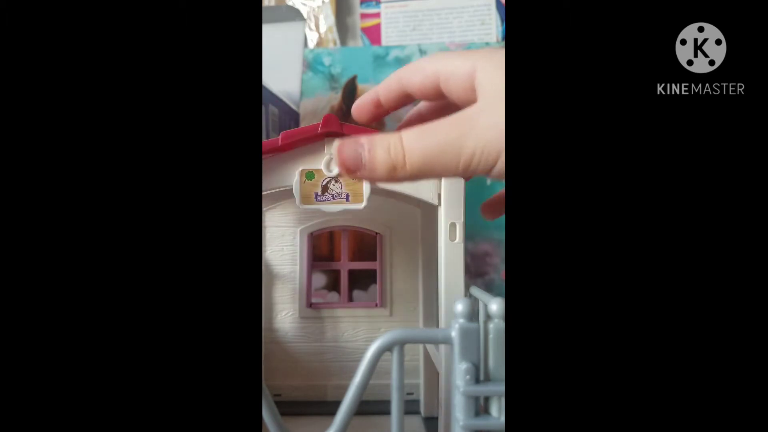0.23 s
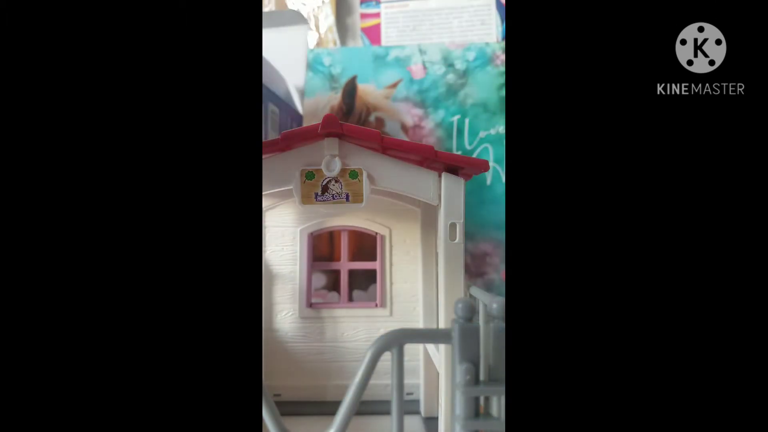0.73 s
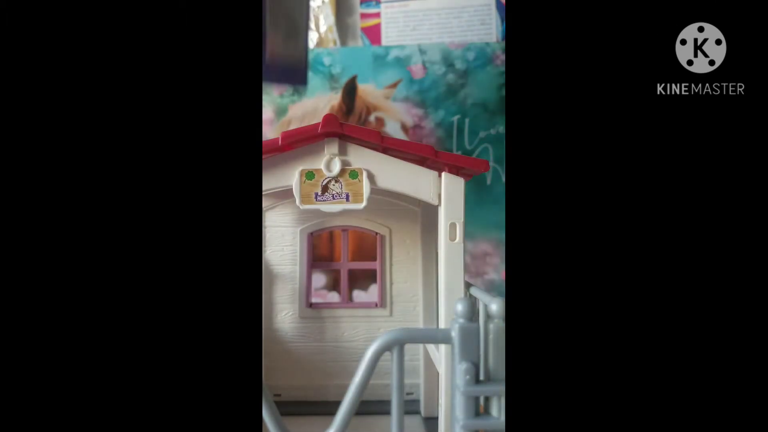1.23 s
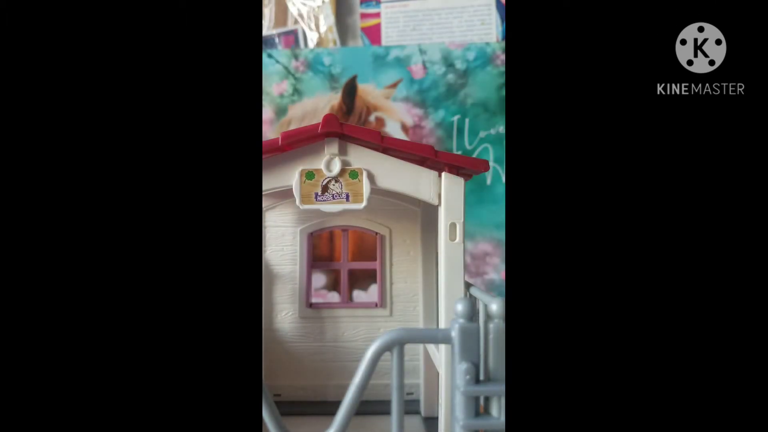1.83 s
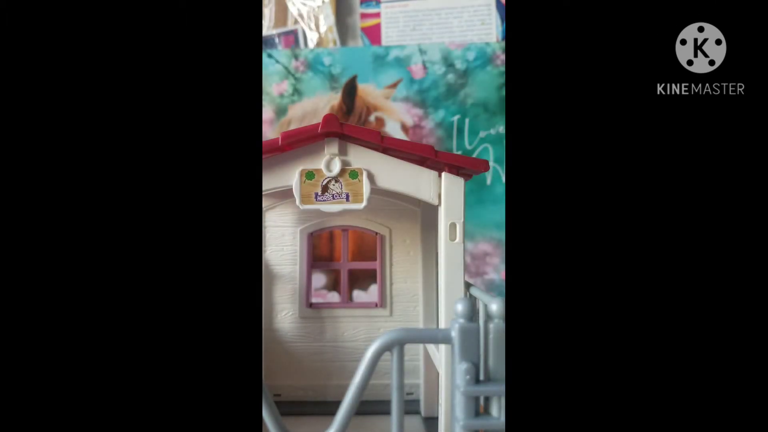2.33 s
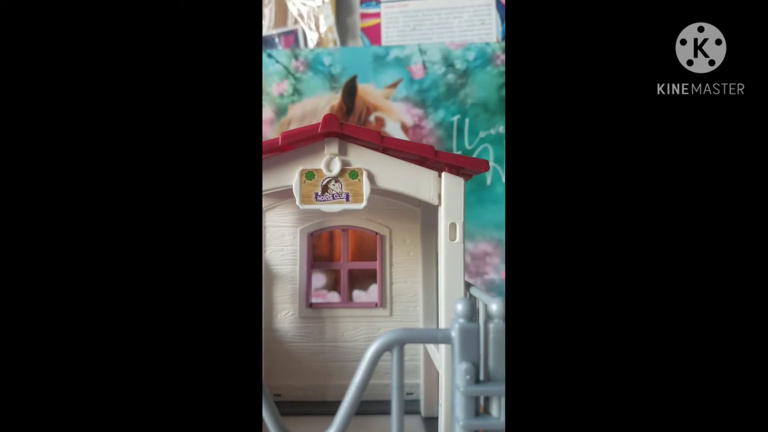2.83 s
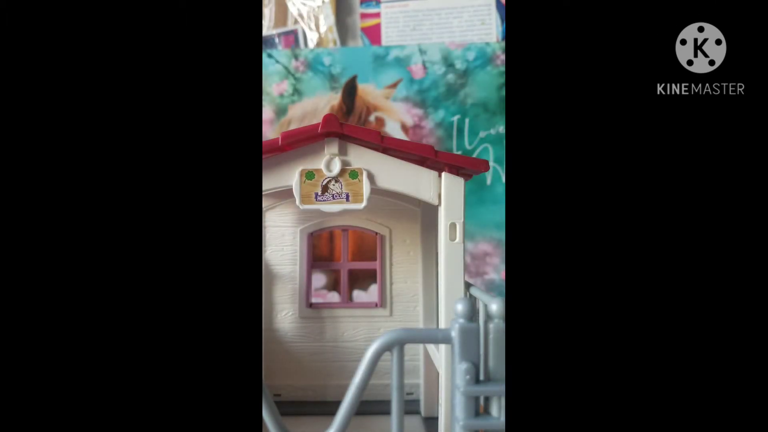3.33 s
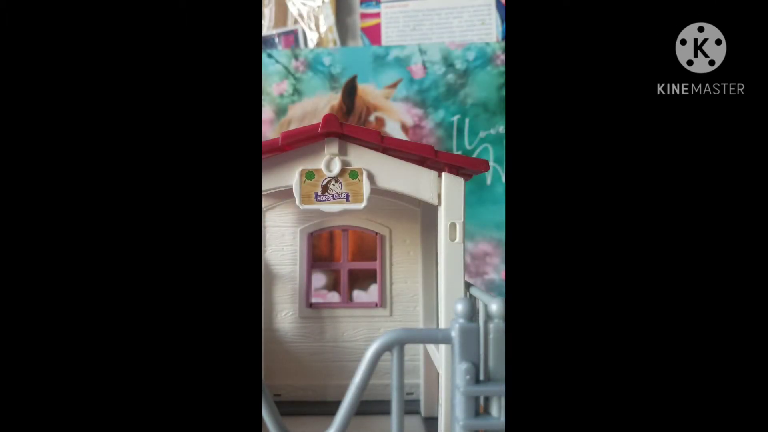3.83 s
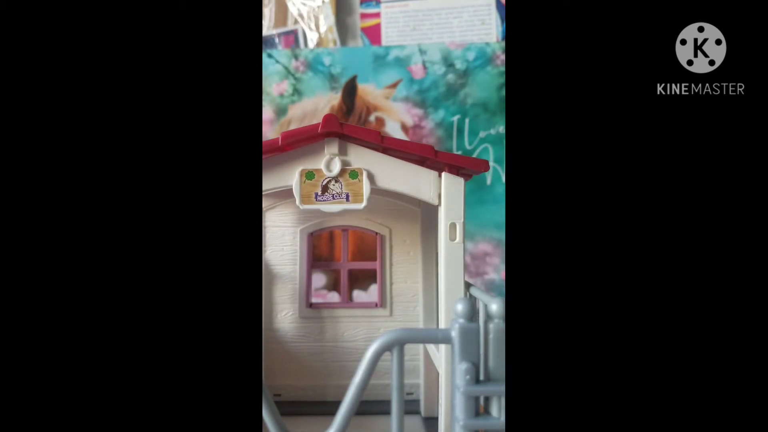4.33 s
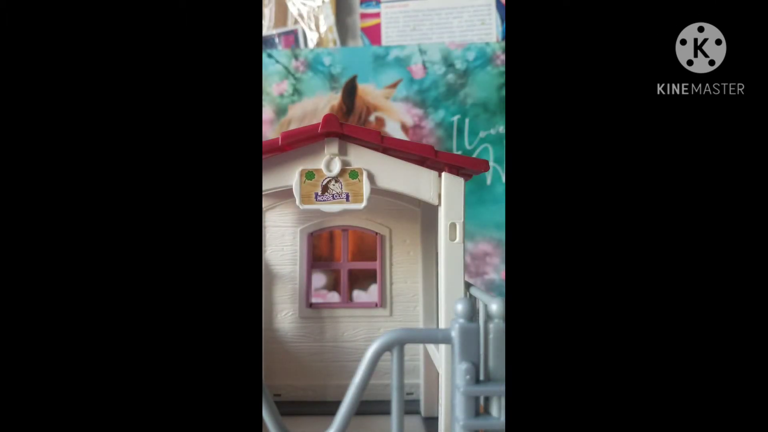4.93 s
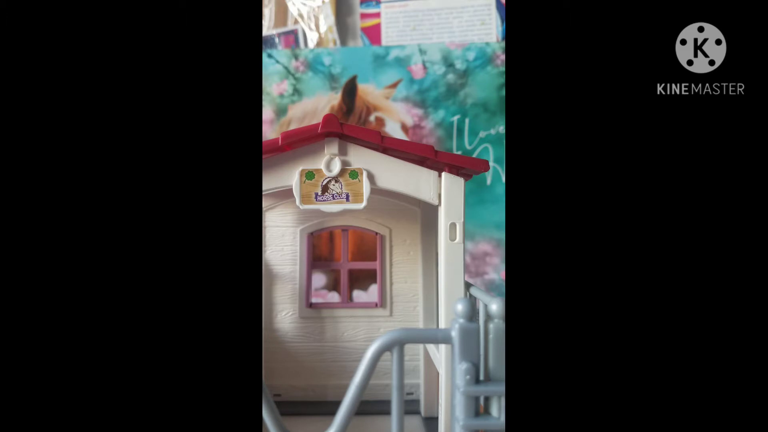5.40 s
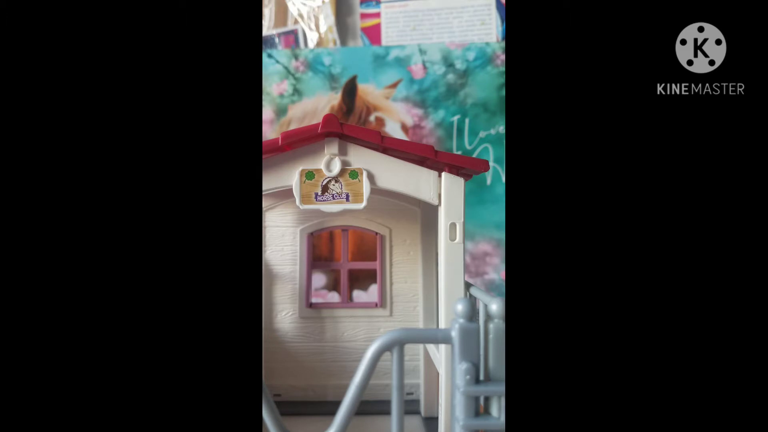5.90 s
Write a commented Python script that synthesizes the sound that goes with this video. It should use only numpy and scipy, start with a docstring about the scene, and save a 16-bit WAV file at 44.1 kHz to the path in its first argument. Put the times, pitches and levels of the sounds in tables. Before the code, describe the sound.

Fingers rub and press a sticker onto a hollow plastic toy with scrapes and knocks, thinning to faint taps in a quiet room.

```python
"""Sticker rubbed onto a hollow toy

Fingers rub and press a sticker onto hollow plastic, then shift and knock parts about on a table.
Stick-slip rubs and taps drive the same ringing modes; skin and paper add a band-shaped bright hiss.
Pushes rock the table's lowest modes; feedback delays make the quiet room, noise the floor of two microphones."""
import sys
import numpy as np
from scipy import signal
from scipy.fft import rfft, irfft, next_fast_len
from scipy.io import wavfile

SR = 44100
rng = np.random.default_rng(int(sys.argv[2]) if len(sys.argv) > 2 else 0)


def unload_wav(signal):
    """Save mono or channel-first audio to the path in sys.argv[1] as 16-bit WAV at rate SR, clipped to [-1, 1]."""
    wavfile.write(
        sys.argv[1],
        SR,
        np.round(np.clip(np.atleast_2d(signal).T, -1, 1) * 32767).astype(np.int16),
    )


N = 271656

# finger strokes: (full pressure from [s], held [s], edge scrape [dB], wall flex [dB], table push [dB],
# skin hiss [dB])
FINGER_STROKES = [(0, 3.6, -74, -81, -68, -72), (0.045, 0.018, -43.5, -33.5, -25, -56),
                  (0.44, 0.0073, -63, -102, -61, -88), (0.535, 0.078, -45.5, -42.5, -35.5, -57),
                  (0.68, 0.021, -33, -35, -37, -50.5), (0.78, 0.096, -57, -57.5, -57.5, -63),
                  (1.0, 0.07, -64, -56, -54.5, -84), (1.32, 0.031, -63, -60, -60, -65),
                  (1.465, 0.063, -48, -47.5, -52, -60.5), (1.57, 0.1, -46, -46, -53, -51),
                  (1.74, 0.092, -46, -28.5, -39.5, -41), (1.86, 0.15, -49.5, -42.5, -44, -61),
                  (2.035, 0.089, -43, -37, -45, -55), (2.2, 0.13, -59.5, -57, -58.5, -70),
                  (2.39, 0.061, -62.5, -53.5, -71, -65), (2.6, 0.13, -66, -56, -55, -67),
                  (2.92, 0.054, -60, -54.5, -54.5, -64.5), (3.02, 0.11, -56, -56.5, -55, -69),
                  (3.075, 0.097, -53, -49, -60, -59), (3.29, 0.009, -62, -61, -62.5, -82.5),
                  (3.54, 0.074, -59, -57.5, -59.5, -64), (3.66, 0.15, -54.5, -53.5, -57, -61),
                  (3.83, 0.12, -37, -46, -47, -42.5), (3.98, 0.049, -54.5, -58, -50.5, -67),
                  (5.1, 0.72, -77, -79, -72, -85), (5.28, 0.03, -72.5, -68.5, -75.5, -74),
                  (5.45, 0.14, -73.5, -70, -64, -75), (5.66, 0.0067, -58, -61, -54, -64),
                  (5.78, 0.093, -79, -76.5, -65.5, -72), (6.025, 0.014, -52.5, -51.5, -53, -60.5)]
PRESS_DB_PER_S, LIFT_DB_PER_S = 350, 250.5


def strokes():
    """Finger pressure builds, holds and lets go; returns scrape, flex, push and hiss gains."""
    return swells(FINGER_STROKES, PRESS_DB_PER_S, LIFT_DB_PER_S)


# taps: (time [s], edge level [dB], knock re edge [dB], knock pitch [Hz], tick re edge [dB])
FINGER_TAPS = [(0.0306, -43, 10, 297, -7.5), (0.0564, -25.5, 6, 240, -18), (0.1737, -56, 16.5, 820, 6),
               (0.4874, -52.5, 14.5, 523, -3), (0.9708, -32, 13, 644, -16), (1.1925, -54.5, -10, 179.3, -2),
               (1.302, -56, 9.5, 510, -20), (1.3238, -46.5, 3.5, 224, -22), (1.427, -64, 1, 400, -31),
               (1.502, -35.5, 0.5, 650, -4), (1.6106, -29.5, 6, 586, -29), (1.723, -30, 4, 194, -2.5),
               (1.736, -11.5, -7, 235, -41), (1.8006, -20, 13.5, 420, -37), (1.821, -19, -1, 218, -20),
               (2.142, -35.5, -5, 430, -33), (2.293, -62, 16, 133, -15), (2.377, -41.5, 12.5, 424, 2),
               (2.578, -41, 6.5, 760, 1), (2.6919, -47.5, 12.5, 350, -32), (2.7191, -50, 9.5, 135, -6),
               (2.9107, -47.5, 7, 575, -17), (3.1098, -37.5, 0.5, 444, -4.5), (3.204, -59, 17, 150, -20),
               (3.3995, -56, 16.5, 141, -22.5), (3.473, -45, 0.5, 450, -2), (3.5049, -66.5, 22, 430, -27),
               (3.527, -54, 13.5, 500, -23), (4.109, -56, -2.5, 189, -6), (5.1636, -48.5, -4, 141, -3),
               (5.3, -54.5, -9.5, 121, -24), (5.39, -63, -15, 165, 7), (5.436, -65.5, 12, 400, -15),
               (5.472, -60, 15, 197, -13), (5.5306, -47.5, 12, 98, -25), (5.5712, -45.5, 7.5, 200, -32),
               (5.67, -38.5, 4, 220, -13), (5.784, -67.5, 21, 250, -15), (5.852, -69, 22, 143, -15)]
# low modes of table and hollow walls: (frequency [Hz], relative level [dB], T60 [s])
HOLLOW_MODES = [(133.4, -8.5, 0.32), (158.6, -8.5, 0.05), (202, -1, 0.072), (219.5, -2, 0.14),
                (290, -1, 0.03), (348, -11.5, 0.24), (396.8, -3, 0.073), (442.3, -3, 0.11),
                (486.8, -9, 0.23), (553, -2.5, 0.068), (621, -5, .08), (688, -7, 0.06), (737, -4.5, 0.092),
                (858, -3.5, 0.037), (958, -2.5, .05), (1042, -0.5, 0.022)]
# high modes of the thin edges: (frequency [Hz], relative level [dB], T60 [s])
EDGE_MODES = [(1270, -4, 0.023), (1426, 3, 0.031), (1662, -0.5, 0.016), (1757, -2.5, 0.029), (1865, 2, .03),
              (2090, 9, 0.0097), (2106, 6.5, 0.024), (2277, -8.5, 0.072), (2470, -5.5, 0.015),
              (2700, -11.5, 0.03), (2994, -13, 0.027), (3450, -22.5, .01), (4600, -12.5, 0.0096)]
WALLS_FROM_HZ = 320  # modes below take the table push, the rest the wall flex
KNOCK_LOSS_DB_PER_OCTAVE = 13.5  # away from the knock pitch
KNOCK_FLOOR_DB = -9  # least knock on any low mode, re edge


def toy(scrape, flex, push):
    """Edges take scrape and taps; a knock drives the low modes nearest its pitch hardest."""
    _, edge_db, knock_db, knock_hz, _ = np.transpose(FINGER_TAPS)
    mode_hz = np.array(HOLLOW_MODES)[:, :1]
    octaves_off = np.abs(np.log2(mode_hz / knock_hz))
    mode_knock_db = np.maximum(knock_db - KNOCK_LOSS_DB_PER_OCTAVE * octaves_off, KNOCK_FLOOR_DB)
    tap_db = edge_db + mode_knock_db
    split = np.sum(mode_hz < WALLS_FROM_HZ)
    walls = body(HOLLOW_MODES[split:], flex, tap_db[split:], wander_db=3.42)
    lows = body(HOLLOW_MODES[:split], push, tap_db[:split], wander_db=1.2)
    hollow = butter_filter(walls + lows, 2, [95, 1300], "band")  # soft fingertips
    edges = body(EDGE_MODES, scrape, [edge_db] * len(EDGE_MODES), wander_db=4.7)
    return hollow + butter_filter(edges, 2, [1100, 5500], "band")


# case of the microphones: (frequency [Hz], left-right difference [dB])
CASE_LEAN = [(60, 5), (250, 3), (500, 1), (1000, -3), (2100, -11), (4000, -19.5)]


def body(modes, rub, tap_db, wander_db):
    """Rub and taps (one row of tap levels per mode) drive a set of resonant modes."""
    total_gain = np.sqrt(np.sum(from_db(np.array(modes)[:, 1]) ** 2))
    out = 0
    for k, ((hz, level_db, t60_s), mode_tap_db) in enumerate(zip(modes, tap_db)):
        buildup = np.sqrt(t60_s * SR / (4 * np.log(1000)))  # rms gain of the resonator on noise
        wander = from_db(wander_db * drift(3.24))  # moving finger favours changing modes
        force = wander * rub / buildup + blows(mode_tap_db, rattle_db=0.5)
        rung = ring(force, hz, t60_s)
        sign = (-1) ** k  # neighbours in opposite sign
        gains = from_db(level_db) / total_gain * sides(at_hz(CASE_LEAN, hz))
        out = out + gains[:, None] * sign * rung
    return out


def blows(level_db, rattle_db):
    """Tap force on one mode: a click of random sign and strength, plus a noise rattle."""
    at = tap_samples()
    force = contacts(level_db + rattle_db, 0.017) * rng.standard_normal(N)
    click_db = level_db + rng.normal(0, 3.0, len(at))
    force[at] += from_db(click_db) * rng.choice([-1, 1], len(at))
    return force


def contacts(level_db, contact_s):
    """Envelope of micro-contacts: each tap starts an exponential fade."""
    clicks = np.zeros(N)
    clicks[tap_samples()] = from_db(level_db)
    fade = np.exp(-1 / (contact_s * SR))
    return signal.lfilter([np.sqrt(1 - fade ** 2)], [1, -fade], clicks + 1e-18)


def tap_samples():
    """Sample index of each tap."""
    return np.round(np.array(FINGER_TAPS)[:, 0] * SR).astype(int)


def slips(per_s, spread_db, clump_db):
    """Stick-slip of skin: random clicks of uneven size that come in clumps; rms 1."""
    size_db = spread_db * np.minimum(rng.exponential(1, N), 5)
    sizes = from_db(size_db) * rng.choice([-1, 1], N)
    happens = rng.random(N) < per_s / SR
    return rms_one(sizes * happens * from_db(clump_db * drift(25)))


# where the hands work: (time [s], left-right difference [dB], right microphone delay [s])
HAND_PLACES = [(0, -12, 0), (.9, -4, 0), (1.5, -4, .0005), (2.4, -4.5, .0005), (3.6, -5, .0002),
               (6.1, -2.5, .0002)]


def place(x):
    """Level difference and arrival delay follow the working hands."""
    pan_db, lag_s = in_time(HAND_PLACES)
    x = x * sides(pan_db)
    n = np.arange(N)
    x[1] = np.interp(n - lag_s * SR, n, x[1])
    return x


# skin and paper spectrum: (frequency [Hz], relative density [dB per Hz])
SKIN_SPECTRUM = [(1760, -28), (3000, -3.5), (3350, -16), (4740, -18), (6980, -19), (11300, -26),
                 (15700, -15)]


def skin(hiss):
    """Dense fine grains under the rub, and a duller tick on each tap."""
    raw = np.array([slips(9000, 1.4, 1.0) for _ in range(4)]).reshape(2, 2, N)
    grains = in_bands(SKIN_SPECTRUM, raw, flicker_db=1.9)
    taps = np.array(FINGER_TAPS)
    tick_s = 0.003
    tick_env = np.sqrt(tick_s * SR / 2) * contacts(taps[:, 1] + taps[:, 4], tick_s)
    ticks = butter_filter(tick_env * grains, 2, 8000, "low")
    return hiss * from_db(1.8 * drift(19)) * grains + ticks


# shoves that rock the table: (full from [s], held [s], level [dB])
TABLE_SHOVES = [(0.05, 0.11, -66), (0.58, 0.055, -56), (1.0, 0.04, -59), (1.33, 0.043, -65),
                (1.6, 0.1, -60), (1.74, 0.088, -51), (2.03, 0.036, -50.5), (2.3, 0.016, -54),
                (2.6, 0.13, -61.5), (2.94, 0.055, -57), (3.09, 0.036, -52), (3.45, 0.085, -73),
                (5.53, 0.04, -61.5)]
# lowest table modes: (frequency [Hz], relative level [dB], T60 [s])
TABLE_MODES = [(53.44, -14, 0.16), (63.9, -8.5, 0.18), (90.4, -6.5, 0.11)]
ROCK_DB_PER_S, SETTLE_DB_PER_S, TABLE_REST_DB = 146.5, 102.5, -74


def table():
    """Soft pushes rock the lowest modes, alike at both microphones."""
    white = rng.standard_normal(N)
    rocking = sum(from_db(db) * rms_one(ring(white, hz, t60_s)) for hz, db, t60_s in TABLE_MODES)
    rocking = butter_filter(rocking, 4, 44, "high")
    shove_gain = swells(TABLE_SHOVES, ROCK_DB_PER_S, SETTLE_DB_PER_S)[0]
    return (shove_gain + from_db(TABLE_REST_DB)) * rms_one(rocking)


ROOM_T60_S, WALL_CUT_HZ, ROOM_DB = 0.31, 7900, -20.5


def room(x):
    """Eight feedback delays a side, duller on every round."""
    size = next_fast_len(N + SR)
    w = 2 * np.pi * np.arange(size // 2 + 1) / size
    dull = 1 / (1 + 1j * w * SR / (2 * np.pi * WALL_CUT_HZ))
    echoes = np.zeros((2, len(w)), complex)
    for k, lag in enumerate(rng.uniform(.009, .03, 16) * SR):
        loss = from_db(-60 * lag / SR / ROOM_T60_S)
        once = loss * dull * np.exp(-1j * w * lag)
        echoes[k % 2] += (-1) ** (k // 2) * once / (1 - once)
    return irfft(rfft(x, size) * echoes, size)[:, :N]


# room and microphone noise: (frequency [Hz], relative density [dB per Hz])
AIR_SPECTRUM = [(15, -40), (25, -13), (64, -9), (82, -3), (254, -6.5), (315, -13.5), (1720, -18),
                (6450, -31), (11700, -32), (15700, -16.5)]
AIR_DB = -66
PORT_HZ, PORT_T60_S, PORT_DB = 11600, 0.0095, -81


def air():
    """Noise floor in bands, plus noise gathered at the microphone port resonance."""
    port = rms_one(ring(rng.standard_normal((2, N)), PORT_HZ, PORT_T60_S))
    floor = in_bands(AIR_SPECTRUM, rng.standard_normal((2, 2, N)), flicker_db=0.63)
    return from_db(AIR_DB) * floor + from_db(PORT_DB) * port


# stereo likeness of noise: (frequency [Hz], left-right correlation [-1..1])
STEREO_LIKENESS = [(60, 0.05), (950, 0.18), (15000, -0.15)]


def in_bands(spectrum, white, flicker_db):
    """Shape two (mid, side) pairs in half-octave bands with flicker and likeness; rms 1."""
    out = 0
    edges_hz = 22 * 2 ** np.arange(0, 10, .5)
    for k, (low, high) in enumerate(zip(edges_hz, edges_hz[1:])):
        hz = np.sqrt(low * high)
        if hz <= spectrum[0][0]:
            continue
        mid, side = butter_filter(white[k % 2], 2, [low, high], "band")  # pairs alternate by band
        alike = np.clip(at_hz(STEREO_LIKENESS, hz), -1, 1)
        gain = from_db(at_hz(spectrum, hz) + flicker_db * drift(6.5))
        out = out + gain * (np.sqrt(1 + alike) * mid + np.sqrt(1 - alike) * side * [[1], [-1]])
    return rms_one(out)


def swells(rows, rise_db_per_s, fall_db_per_s):
    """Each row builds, holds and fades; powers add, one gain per level column."""
    t, power = np.arange(0, N, 32) / SR, 1e-12
    for start_s, held_s, *level_db in rows:
        rise_loss_db = rise_db_per_s * np.maximum(start_s - t, 0)
        fall_loss_db = fall_db_per_s * np.maximum(t - start_s - held_s, 0)
        power = power + from_db(np.array(level_db)[:, None] - (rise_loss_db + fall_loss_db)) ** 2
    return [np.interp(np.arange(N) / SR, t, np.sqrt(p)) for p in power]


def ring(force, hz, t60_s):
    """Two-pole resonator: a unit click sets a decaying sine of height 1 ringing."""
    r, w = from_db(-60 / (t60_s * SR)), 2 * np.pi * hz / SR
    return signal.lfilter([0, np.sin(w)], [1, -2 * r * np.cos(w), r * r], force + 1e-18)


def drift(rate_hz):
    """Slow chance: noise at every 40th sample through a double one-pole low-pass; rms 1."""
    r = np.exp(-80 * np.pi * rate_hz / SR)
    noise = rng.standard_normal(N // 40 + 2002)
    slow = signal.lfilter([1], [1, -2 * r, r * r], noise)[2000:]  # drop the filter start
    return np.interp(np.arange(N) / 40, np.arange(len(slow)), rms_one(slow))


def butter_filter(x, order, cut_hz, kind):
    """Butterworth filter."""
    return signal.sosfilt(signal.butter(order, cut_hz, kind, fs=SR, output="sos"), x)


def in_time(rows):
    """Interpolate each column over time."""
    time_s, *columns = np.transpose(rows)
    return [np.interp(np.arange(N) / SR, time_s, column) for column in columns]


def at_hz(points, hz):
    """Interpolate a table over log frequency."""
    table_hz, values = np.transpose(points)
    return np.interp(np.log(hz), np.log(table_hz), values)


def sides(pan_db):
    """Left and right gains for a level difference."""
    return from_db(np.array([pan_db / 2, -pan_db / 2]))


def from_db(db):
    """Decibels to amplitude."""
    return 10 ** (np.asarray(db) / 20)


def rms_one(x):
    """Scale to rms 1."""
    return x / np.sqrt(np.mean(x ** 2) + 1e-20)


def scene():
    """Toy and skin, their room echoes, the table and the noise floor."""
    scrape, flex, push, hiss = strokes()
    finger = slips(3500, 4.2, 2.0)
    near = place(toy(scrape * finger, flex * finger, push * finger)) + skin(hiss)
    echoes = butter_filter(room(near), 2, 250, "high")  # lows reach both ports alike
    return near + from_db(ROOM_DB) * echoes + table() + air()


CUTOFF_HZ = 15500


def record(dry):
    """Steep elliptic low-pass cuts the top."""
    return signal.sosfilt(signal.ellip(12, .5, 70, CUTOFF_HZ, fs=SR, output="sos"), dry)


dry = scene()
out = record(dry)
unload_wav(out)
```